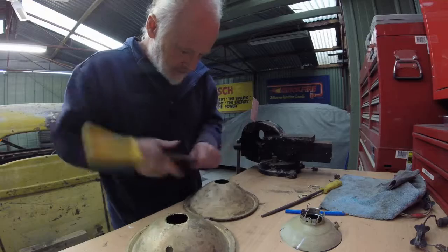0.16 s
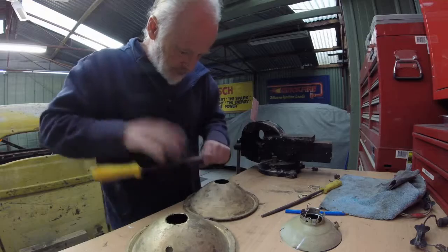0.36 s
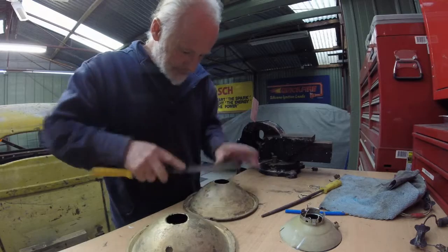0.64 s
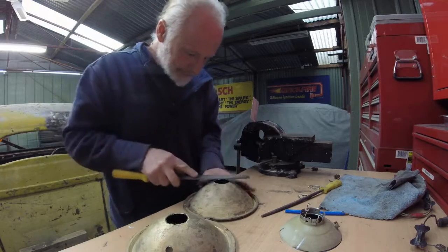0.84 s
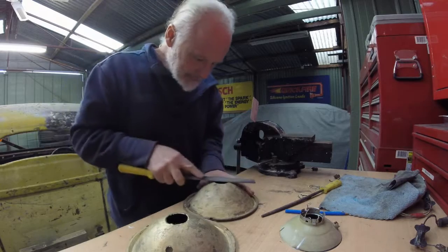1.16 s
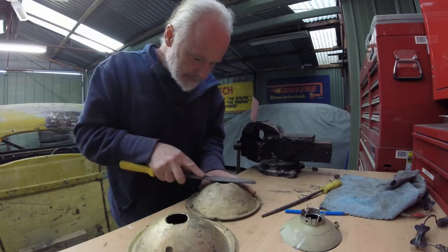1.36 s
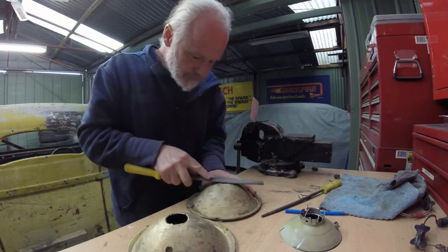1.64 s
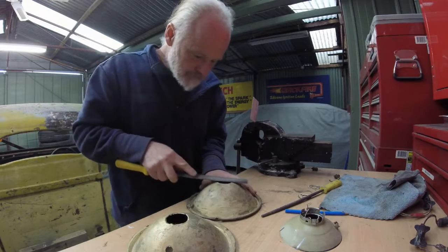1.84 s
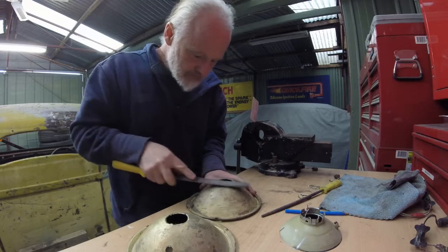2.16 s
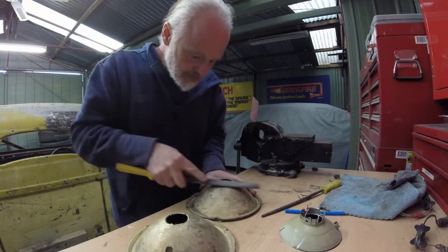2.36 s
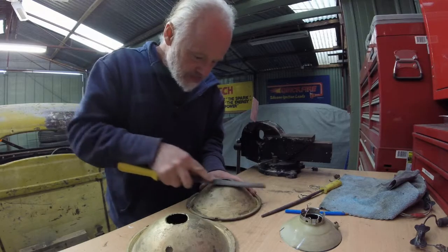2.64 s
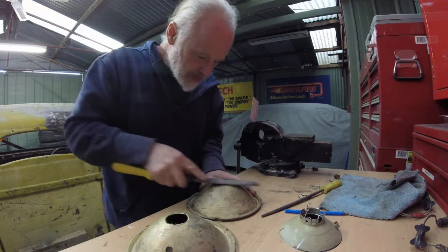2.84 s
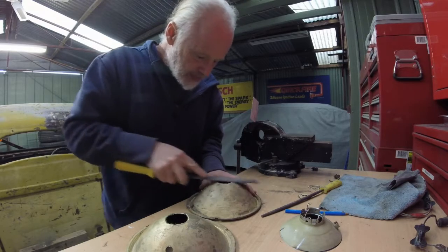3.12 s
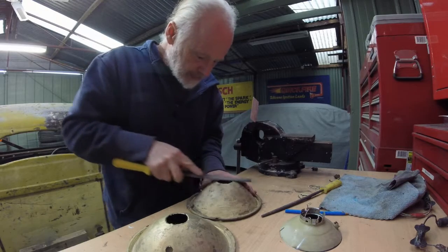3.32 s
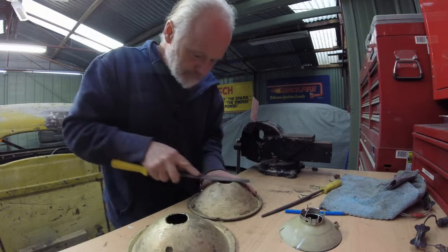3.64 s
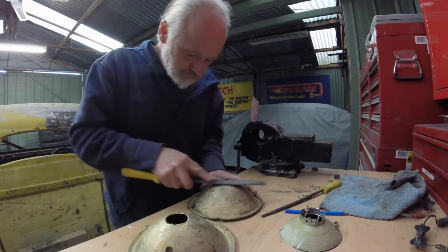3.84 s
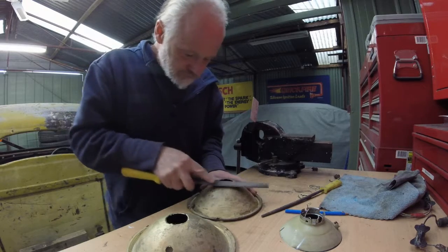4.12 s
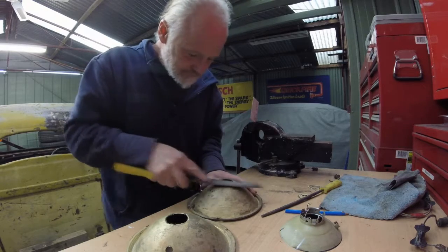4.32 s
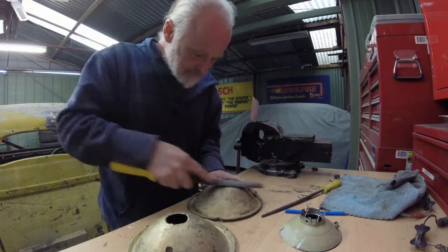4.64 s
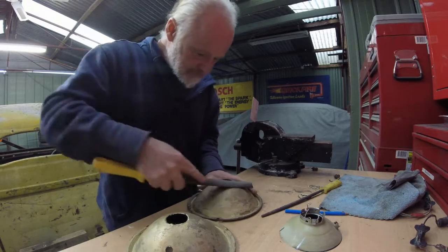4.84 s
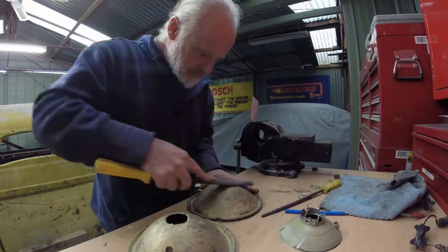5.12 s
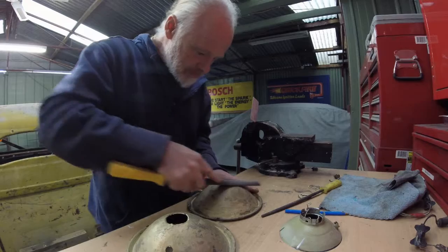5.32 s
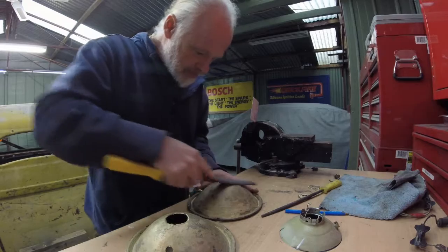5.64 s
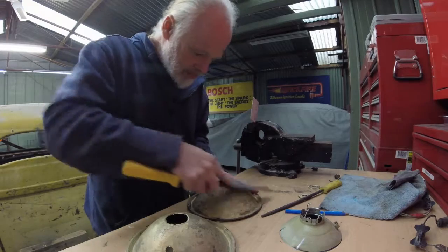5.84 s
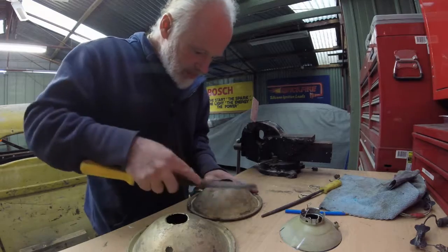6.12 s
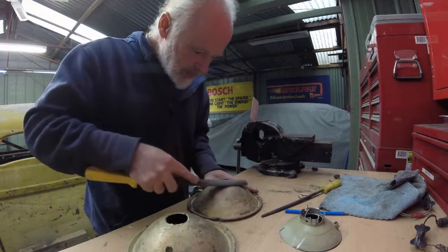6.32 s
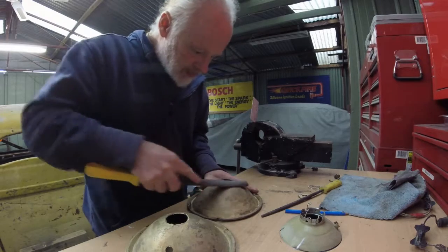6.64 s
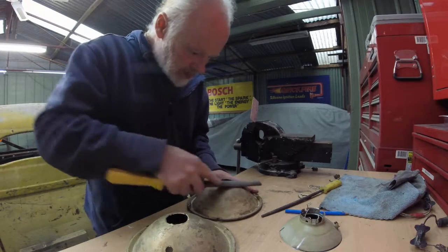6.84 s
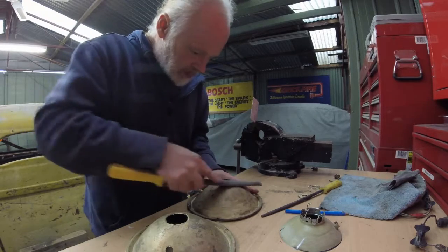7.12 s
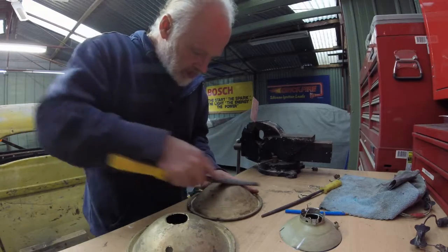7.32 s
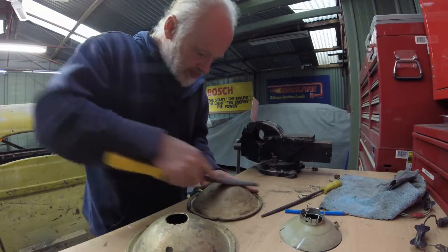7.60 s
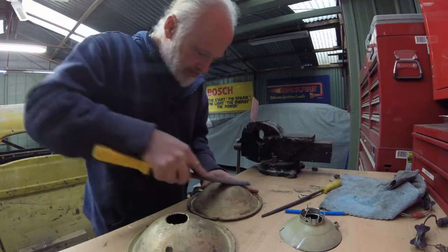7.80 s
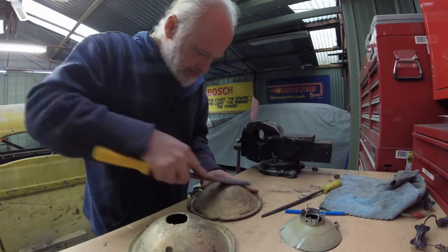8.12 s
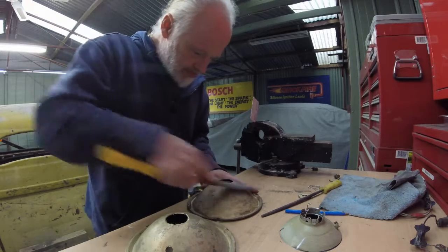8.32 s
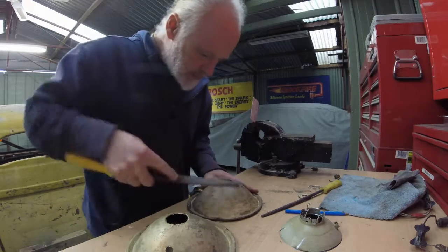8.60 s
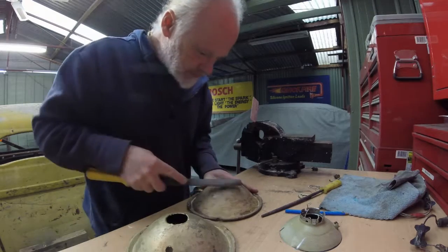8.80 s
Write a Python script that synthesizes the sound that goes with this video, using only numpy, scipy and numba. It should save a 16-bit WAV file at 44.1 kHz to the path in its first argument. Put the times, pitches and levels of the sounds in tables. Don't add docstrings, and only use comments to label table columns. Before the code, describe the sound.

Quick to-and-fro filing on a hollow metal shell, gritty scrapes with loose clattering and bench thuds, over low rumble in a metal-walled workshop.

```python
import sys
import numpy as np
from scipy import signal
from scipy.fft import rfft, irfft
from scipy.io import wavfile
from scipy.ndimage import uniform_filter1d
from numba import njit

SR = 44100
rng = np.random.default_rng(int(sys.argv[2]) if len(sys.argv) > 2 else 0)


def dump(signal):
    limited = np.clip(np.atleast_2d(signal).T, -1, 1)
    pcm = np.round(limited * 32767).astype(np.int16)
    wavfile.write(sys.argv[1], SR, pcm)


def amplitude_ratio(level_db):
    exponent = np.asarray(level_db, float) / 20
    return 10 ** exponent


N = 395136
TIME = np.arange(N) / SR

# frequency in Hz, width in Hz, level in dB.
RATTLE_MODES = [(263, 36, -8.5), (303, 34, -6), (329, 30.6, 0), (355.5, 36, -1.5), (432.3, 50, -5),
                (455.6, 93, -3), (520, 46, 1.5), (555.8, 46, -1.5), (617, 44, -7), (693.6, 11, -8),
                (826, 55, -7.5), (915, 66, -10), (995, 36, -6.5), (1140, 54, -15.5)]


def strokes():
    half, turn, bite_db, shake_db = motion()
    speed = np.sin(np.pi / 2 * turn)
    resting = np.clip(9.1 * turn, 0, 1)
    fine = (speed ** 1.64 + 0.15 * resting) * amplitude_ratio(1.26 * walk(45))
    fine = fine * teeth(9000, 1.07)
    coarse = (speed ** 1.06 + 0.37 * resting) * amplitude_ratio(1.77 * walk(40))
    coarse = coarse * teeth(2500, 1.52)
    wall_db = 0.65 * bite_db + 0.55 * shake_db + 8
    return amplitude_ratio(2.5) * metal(fine, coarse, half, bite_db, wall_db, shake_db, RATTLE_MODES, damping=0.87)


# turn in seconds, time to full speed in seconds,
# bite of the file in dB, shaking of the dome in dB.
PUSH_STROKES = [(1.3, 0.049, -46.5, -25), (1.721, 0.092, -44, -28), (2.065, .12, -37.5, -21.5),
                (2.424, 0.016, -44, -27), (2.709, 0.062, -40.5, -24.5), (3.018, 0.05, -38, -20.5),
                (3.312, 0.071, -35, -17.5), (3.587, 0.064, -39.5, -24), (3.911, 0.054, -39, -18),
                (4.2, 0.031, -40.5, -19.5), (4.495, .057, -40, -22.5), (4.789, 0.057, -43, -36),
                (5.088, 0.06, -43.5, -36.5), (5.368, 0.079, -41.5, -32.5), (5.662, 0.043, -40, -34.5),
                (5.946, 0.056, -36.5, -26.5), (6.755, 0.067, -41.5, -35), (7.059, 0.056, -40.5, -31.5),
                (7.333, 0.051, -42.5, -31), (7.623, .053, -38, -36.5), (7.912, 0.058, -40, -34),
                (8.201, 0.043, -40.5, -34), (8.486, 0.038, -37, -33.5)]
# turn in seconds,
# time to full speed in seconds, bite of the file in dB, shaking of the dome in dB.
PULL_STROKES = [(1.14, .053, -71, -49), (1.25, .045, -64, -38.5), (1.533, .12, -47.5, -30),
                (1.908, 0.084, -32.5, -21.5), (2.254, 0.057, -44, -27), (2.572, 0.07, -43.5, -29.5),
                (2.868, 0.075, -39.5, -25), (3.159, 0.062, -32.5, -23.5), (3.442, 0.048, -35, -24),
                (3.738, 0.055, -35, -25), (4.042, 0.074, -35.5, -25), (4.343, 0.05, -38.5, -27),
                (4.638, .06, -41, -27.5), (4.954, 0.051, -45.5, -36.5), (5.233, 0.041, -46, -30),
                (5.517, 0.068, -41, -34), (5.81, 0.067, -37, -29.5), (6.574, 0.095, -41.5, -36),
                (6.904, 0.077, -38.5, -33), (7.2, 0.058, -42, -31), (7.466, 0.076, -38.5, -36.5),
                (7.761, 0.072, -40.5, -33), (8.055, 0.067, -38, -34), (8.34, 0.063, -40, -35)]
FILE_STOPS = [
    1.476,
    6.08,
    8.584,
]


def motion():
    start, rise, bite_db, shake_db = np.transpose(sorted(PUSH_STROKES + PULL_STROKES))
    turn_pause_s = 0.011
    ends = np.sort(np.concatenate([start - turn_pause_s, FILE_STOPS]))
    next_end = ends[np.searchsorted(ends, start)]
    fall = np.clip(next_end - start - rise, .02, .3)
    k = np.clip(np.searchsorted(start, TIME) - 1, 0, None)
    since = TIME - start[k]
    slowing = 1 - (since - rise[k]) / fall[k]
    turn = np.where(since < rise[k], since / rise[k], slowing)
    half = 2 * k + (since > rise[k])
    return half, np.clip(turn, 0, 1), np.repeat(bite_db, 2), np.repeat(shake_db, 2)


# frequency in Hz, width in Hz, level in dB.
FILE_MODES = [(4334, 140, 3), (4590, 52, -1.5), (5030, 100, -2.5), (5695, 47, -3), (6241, 190, -4.5),
              (6660, 25, -6.5), (7070, 13, -12), (7540, 190, -19), (7960, 51, -12), (8940, 26, -12),
              (9460, 14, -16), (11300, 51, -16), (11700, 34, -40), (12400, 51, -31)]
# frequency in Hz, level in dB, 60 dB decay time in seconds.
FILE_RINGING = [(4314, 3, 0.43), (4540, -6, 0.2), (5270, 0.5, 0.17), (5040, -19, 0.93), (5500, -18, 0.38),
                (6238, -3, 0.25), (6334, 5.5, 0.27), (6760, -28, 0.36), (7830, -3, 0.37), (7930, -3, 0.35),
                (8270, -5, 0.081), (9740, -8, 0.31), (10400, -25, 0.26), (11500, -17, 0.24)]
# frequency in Hz, width in Hz, level in dB.
FILE_DENSE = [(4940, 420, 1.5), (5980, 1440, 1), (7960, 610, -5.5), (9600, 1900, -18), (12600, 3400, -29)]
# frequency in Hz, width in Hz, level in dB.
FILE_TOP_MODES = [(9300, 68, -4.5), (9870, 39, -22), (9900, 44, 15), (10800, 18, 10), (11030, 54, -7),
                  (10860, 99, -26), (13000, 190, 4), (13000, 100, -20)]
# frequency in Hz, width in Hz, level in dB.
WALL_MODES = [(1300, 54, -7.5), (1424, 99, -9), (1554, 27, 1.5), (1698, 45, -9.5), (1878, 56, -5),
              (1980, 49, 1.5), (2063, 143, -1), (2194, 130, -6.5), (2400, 51, -11), (2823, 74, -9.5),
              (3110, 460, -17), (3330, 270, -19), (3506, 72, -17)]
# frequency in Hz, width in Hz, level in dB.
DOME_DENSE = [(387, 170, 2.5), (944, 620, -8.5), (1790, 1550, -9), (2840, 1240, -16), (4030, 490, -21.5)]


def metal(force, rough, blow, file_db, wall_db, rattle_db, rattle, damping):
    gripped = [(hz, 4.3 * np.log(1000) / np.pi / t60, db - 5.5) for hz, db, t60 in FILE_RINGING]
    held = [(hz, damping * max(width, 55.), db) for hz, width, db in FILE_MODES + gripped]
    wall = [(hz, damping * width, db) for hz, width, db in WALL_MODES]
    jumbled = np.sign(rng.standard_normal(N))

    steel = body(held, force, blow, file_db, scatter_db=2.5)
    steel = steel + body(FILE_DENSE[:3], force * jumbled, blow, file_db - 5.5, scatter_db=-1.5)
    top_db = file_db - 13.5 + 0.85 * np.clip(file_db - wall_db, -15, 3)
    steel = steel + body(FILE_TOP_MODES, force, blow, top_db - 7.0, scatter_db=6.0)
    steel = steel + body(FILE_DENSE[3:], force * jumbled, blow, top_db, scatter_db=2.0)
    steel = signal.sosfilt(signal.butter(4, 4000., "high", fs=SR, output="sos"), steel)

    dome = body(wall, force, blow, wall_db, scatter_db=4.0)
    dome = dome + body(rattle, rough, blow, rattle_db, scatter_db=3.0)
    dome = dome + body(DOME_DENSE[2:], force * jumbled, blow, wall_db - 4.0, scatter_db=1.9)
    dome = dome + body(DOME_DENSE[:2], rough * jumbled, blow, rattle_db - 5.5, scatter_db=1.4)
    return steel + dome


def body(modes, force, blow, blow_db, scatter_db):
    hz, width, db = np.transpose(sorted(modes))
    loss = np.pi * np.clip(width, 3, 6000) / SR
    sense = (-1.) ** np.arange(len(hz))
    scatter = scatter_db * rng.standard_normal((len(blow_db), len(hz)))
    gains = amplitude_ratio(db + scatter) * sense * loss
    rms = np.sqrt(np.sum(gains ** 2 / (4 * loss), axis=1, keepdims=True))
    gains = gains / rms * amplitude_ratio(blow_db)[:, None]
    return ring(force, blow, np.exp(2j * np.pi * hz / SR - loss), gains)


@njit
def ring(force, blow, poles, gains):
    out = np.zeros(len(force))
    for m in range(len(poles)):
        z = 0j
        for i in range(len(force)):
            z = z * poles[m] + force[i] * gains[blow[i], m] + 1e-18
            out[i] += z.imag
    return out


def teeth(per_s, spread_db):
    hit = rng.random(N) < per_s / SR
    size = rng.standard_normal(N) * amplitude_ratio(spread_db * rng.exponential(size=N))
    return level(hit * size, 0)


def walk(rate):
    hold = int(SR / rate)
    steps = np.repeat(rng.standard_normal(N // hold + 1), hold)
    return 1.39 * uniform_filter1d(uniform_filter1d(steps, hold), hold)[:N]


def level(x, db):
    return x * amplitude_ratio(db) / np.sqrt(np.mean(x ** 2))


def knocks():
    k, since, (peak_db, wall_db, file_db, swell) = blows()
    first = amplitude_ratio(3.5) * (since > 0) * np.exp(-since / .0012)
    since = since / np.clip(swell[k], .001, .05)
    chatter = since ** 0.79 * np.exp(.3 - 0.24 * since ** 2)
    hits = teeth(9000, 1.4)
    fine = (first + chatter) * hits
    coarse = (0.45 * first + chatter) * hits
    pressed = [(hz, 1.24 * width, db) for hz, width, db in RATTLE_MODES[:10]]
    struck = metal(fine, coarse, k, peak_db + file_db, peak_db + wall_db, peak_db, pressed, damping=1.36)
    return amplitude_ratio(-10.0) * struck


# time in seconds, peak in dB,
# wall relative to the peak in dB, file relative to the peak in dB.
DOME_KNOCKS = [(1.364, 5, -8, -22), (1.392, -0.5, -0.5, -23), (1.85, 4, -12.5, -24), (1.9, -21, -24, -32),
               (1.959, -13, 5, -22), (2.074, -1.5, -13.5, -34), (2.138, -4, -13.5, -18),
               (2.198, -3, -7.5, -24), (2.288, -6, -25, -23), (2.615, -5.5, -17, -21),
               (2.732, -0.5, -21, -43), (2.877, -12, -14, -23), (3.035, 2.5, -13, -31),
               (3.235, -13, 11, 0.5), (3.354, -0.5, -12, -23), (3.395, 2, -11.5, -24), (3.499, -11, 4, -10),
               (3.694, 4, -14.5, -26), (3.799, -6.5, -5, -13), (3.938, -3.5, -11, -17.5),
               (3.958, 0, -6, -20), (3.997, -4.5, -4.5, -17), (4.205, -4.5, -12, -34),
               (4.224, -3, -5.5, -20), (4.27, -6.5, -16, -17.5), (4.552, -6.5, -13, -17),
               (5.308, -13, -18, -29), (5.708, -16, -0.5, -17), (6, -10.5, -6, -23),
               (6.968, -9.5, -24, -21)]
# time in seconds, peak in dB,
# wall relative to the peak in dB, file relative to the peak in dB, chatter time in seconds.
FILE_TOUCHES = [
    (1.131, -4.5, -17.5, -37, .0055),
    (1.313, -22, -16, -24, .004),
    (1.568, -27, 0, -17, 0.0067),
    (4.497, -26, -18, -26, 0.0054),
    (6.052, -24, 2, 2, 0.0069),
    (6.524, -9.5, -10.5, -20, 0.0062),
    (6.558, -18, -9, -20, 0.0069),
    (8.547, -25.5, -9, 4, 0.0057),
    (8.786, -43, 5, -1, .002),
]


def blows():
    chatter_s = 0.0049
    table = np.transpose(sorted([row + (chatter_s,) for row in DOME_KNOCKS] + FILE_TOUCHES))
    k = np.clip(np.searchsorted(table[0], TIME) - 1, 0, None)
    return k, np.clip(TIME - table[0, k], 0, None), table[1:]


# frequency in Hz, width in Hz, level in dB.
BENCH_TOP_MODES = [(102, 11, -21), (155.8, 19.5, 0), (173.6, 128, -12)]
# time in seconds, level in dB.
HAND_WEIGHT = [(1.1, 10), (1.45, -3.5), (1.9, -3), (2.35, 6.5), (2.9, -0.5), (3.4, 2.5), (4.1, 4.5),
               (4.7, -1), (5.3, 5.5), (5.8, -0.5), (6.1, -6), (6.55, 4), (7.15, 5), (7.6, 2), (8.1, 3.5),
               (8.45, 0.5), (8.6, 6)]


def bench():
    half, turn, _, shake_db = motion()
    shaken = (turn + 0.53 * (turn > 0)) * amplitude_ratio(0.75 * shake_db[half] - 10 + 1.5 * walk(8))
    lag_s = .03
    shaken = uniform_filter1d(np.interp(TIME - lag_s, TIME, shaken), SR // 30)
    k, since, (peak_db, *_) = blows()
    thud = amplitude_ratio(peak_db[k] - 27) * (since > 0) * np.exp(-since / 0.028)
    lean = amplitude_ratio(np.interp(TIME, *np.transpose(HAND_WEIGHT)))
    force = (shaken + thud) * lean * teeth(1500, 2.06)
    return body(BENCH_TOP_MODES, force, np.zeros(N, np.int64), np.array([-1.5]), scatter_db=0.5)


# frequency in Hz, level in dB, 60 dB decay time in seconds.
FREE_MODES = [(2590, -3, .12), (4150, -6, .18), (5660, -3, .4), (6150, -8, .2), (6980, -9, .2),
              (7560, -6, .25), (8200, -15, .15)]
# start in seconds, length in seconds, level in dB.
LAST_BITES = [
    (6.03, .05, -44.5),
    (8.504, 0.064, -42.5),
]


def lifts():
    force = 0
    for start, length, db in LAST_BITES:
        force = force + amplitude_ratio(db) * np.sin(np.pi * np.clip((TIME - start) / length, 0, 1))
    modes = [(hz, 1.3 * np.log(1000) / np.pi / t60, db) for hz, db, t60 in FREE_MODES]
    return body(modes, force * teeth(6000, 1.5), np.zeros(N, np.int64), np.array([6.]), scatter_db=0.)


# frequency in Hz, width in Hz, level in dB.
HANDLED_MODES = [(1900, 62, 0), (1990, 30, -2), (2100, 40, -7), (3590, 60, -12), (4097, 30, -10),
                 (5660, 400, -30), (4000, 3000, -27), (9000, 6000, -36)]
# time in seconds, level in dB.
HANDLING_FORCE = [(0, -45.5), (.05, -54), (.07, -54), (.11, -51.5), (.17, -54), (.22, -72), (.3, -90)]


def handling():
    force = amplitude_ratio(np.interp(TIME, *np.transpose(HANDLING_FORCE), right=-99)) * teeth(2500, 1.5)
    return body(HANDLED_MODES, force, np.zeros(N, np.int64), np.array([0.]), scatter_db=0)


def shed_tail(x, t60_s, wet_db):
    t = np.arange(SR // 2) / SR
    echo = rng.standard_normal(len(t)) * amplitude_ratio(-60 * t / t60_s) * (t > .006)
    echo = echo / np.sqrt(np.sum(echo ** 2))
    return x + amplitude_ratio(wet_db) * signal.oaconvolve(x, echo)[:N]


# frequency in Hz, density in dB per Hz.
SHED_SPECTRUM = [(20, -2.5), (49, -8.5), (103, -8.5), (160, -13.5), (800, -26), (2000, -28.5),
                 (2700, -40.5), (14000, -74)]
# time in seconds, level in dB.
SHED_GAIN = [(0, -44), (1.1, -43.5), (3, -40), (5.2, -37.5), (6.4, -39), (8.96, -37)]


def shed_noise():
    hz = np.fft.rfftfreq(N, 1 / SR) + 1
    point_hz, point_db = np.transpose(SHED_SPECTRUM)
    colour = amplitude_ratio(np.interp(np.log(hz), np.log(point_hz), point_db))
    colour = rfft(rng.standard_normal(N)) * colour
    octave = np.floor(np.log2(hz / 20))
    out = sum(irfft(colour * (octave == b), N) * amplitude_ratio(1.2 * walk(5.6)) for b in range(10))
    return level(out, 0) * amplitude_ratio(np.interp(TIME, *np.transpose(SHED_GAIN)))


def camera_hiss():
    band = signal.butter(2, (2200., 7800), "band", fs=SR, output="sos")
    return level(signal.sosfilt(band, rng.standard_normal(N)), -69.5)


def scene():
    work = strokes() + knocks() + bench() + handling() + lifts()
    work = signal.sosfilt(signal.butter(3, [95., 12500.], "band", fs=SR, output="sos"), work)
    return (shed_tail(work, t60_s=0.37, wet_db=-7.5) + shed_noise())[None]


def roll_off(x):
    return signal.sosfilt(signal.butter(12, 15200, fs=SR, output="sos"), x)


def record(dry):
    rounding = 0.6
    mix = np.tanh(rounding * dry) / rounding + camera_hiss()
    return roll_off(mix)


dry = scene()
out = record(dry)
dump(out)
```